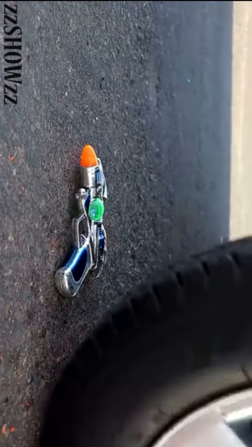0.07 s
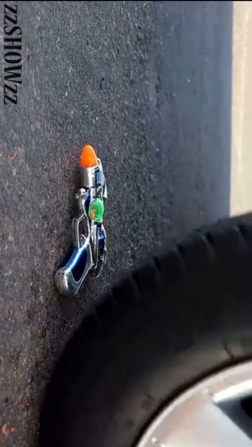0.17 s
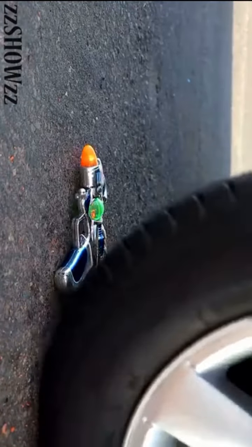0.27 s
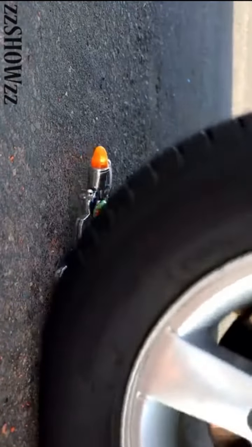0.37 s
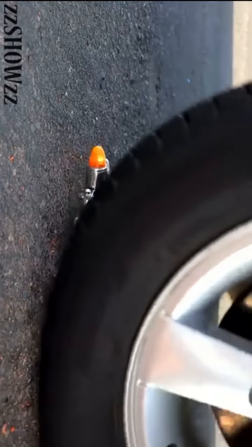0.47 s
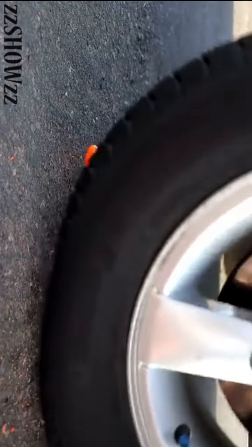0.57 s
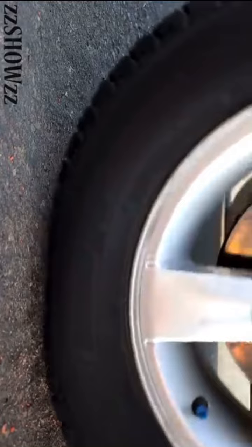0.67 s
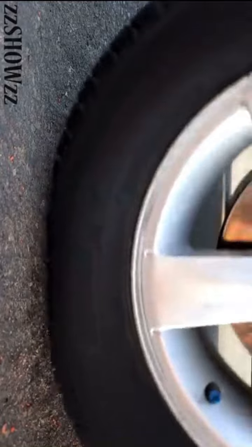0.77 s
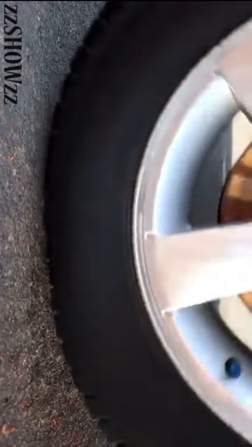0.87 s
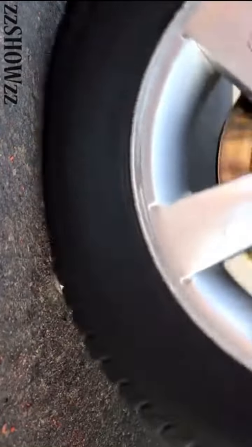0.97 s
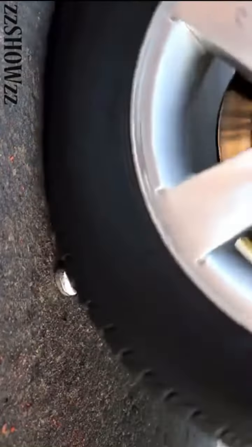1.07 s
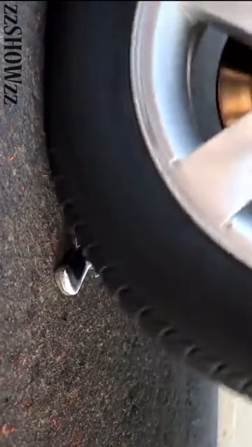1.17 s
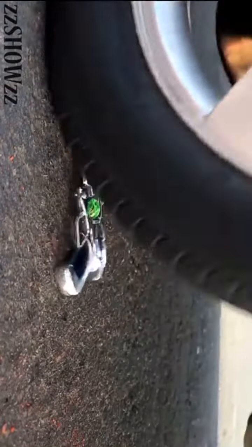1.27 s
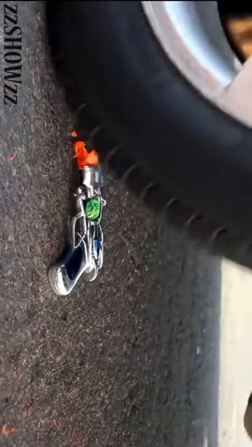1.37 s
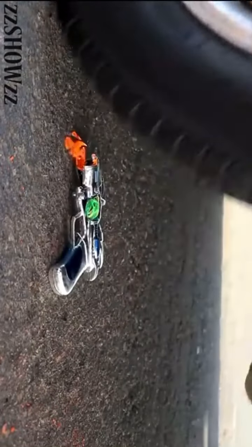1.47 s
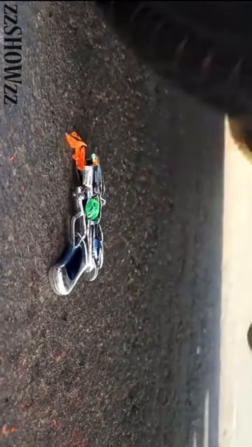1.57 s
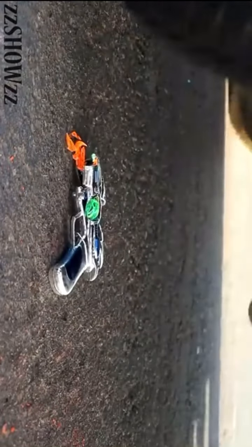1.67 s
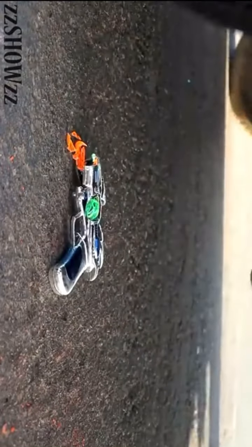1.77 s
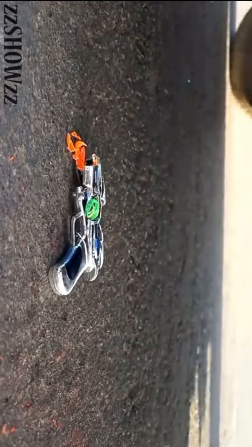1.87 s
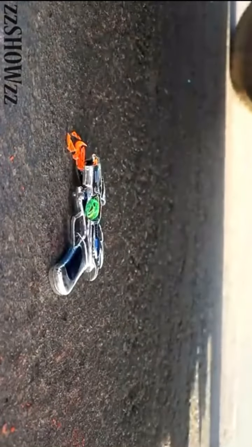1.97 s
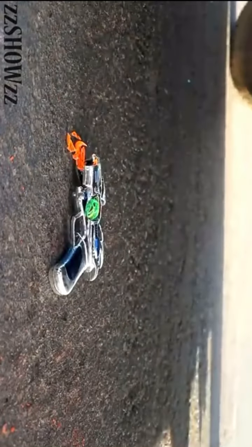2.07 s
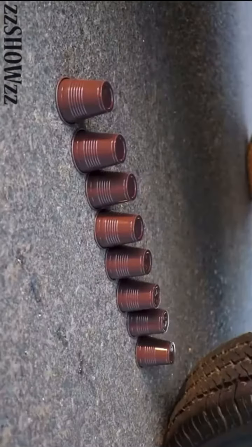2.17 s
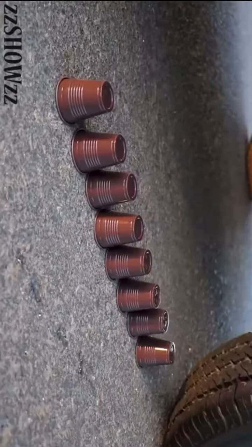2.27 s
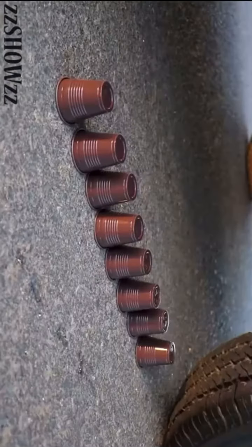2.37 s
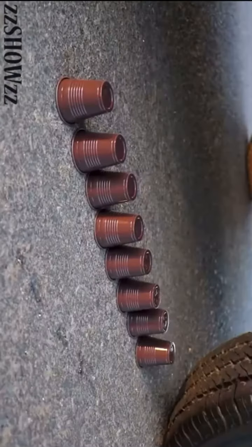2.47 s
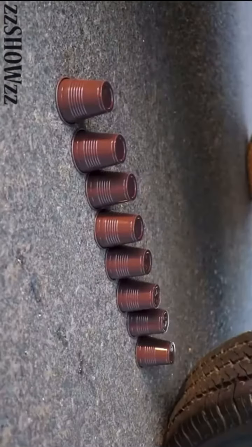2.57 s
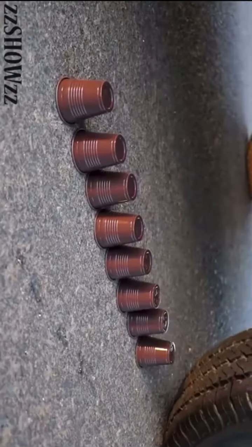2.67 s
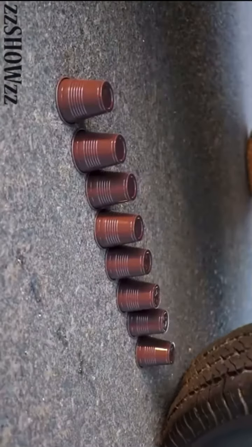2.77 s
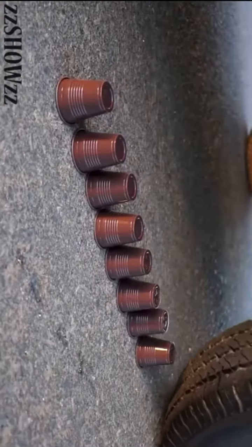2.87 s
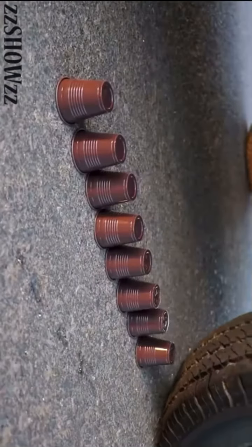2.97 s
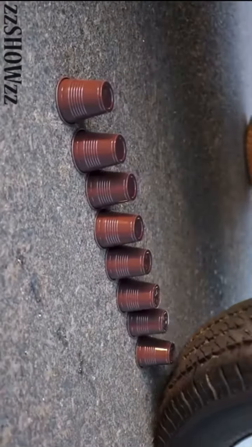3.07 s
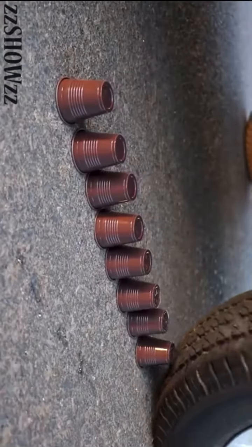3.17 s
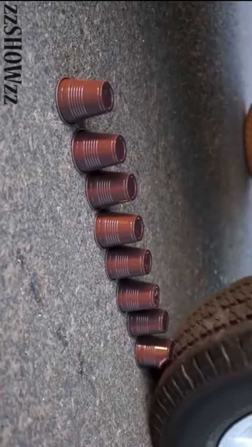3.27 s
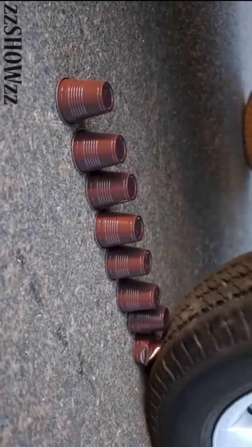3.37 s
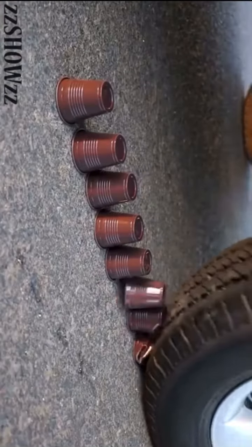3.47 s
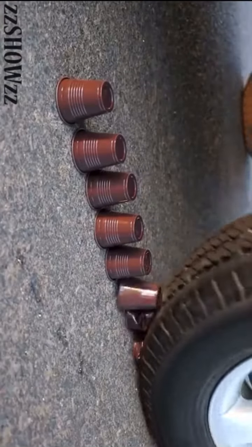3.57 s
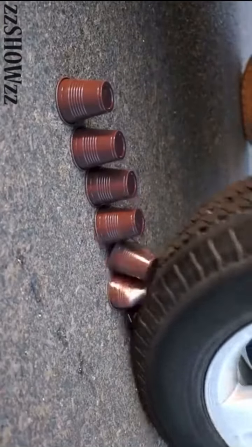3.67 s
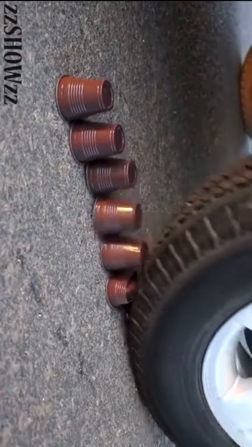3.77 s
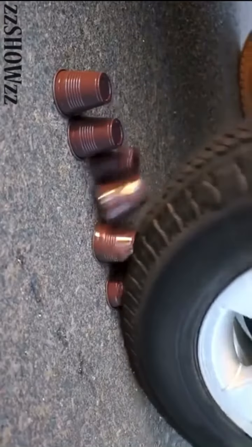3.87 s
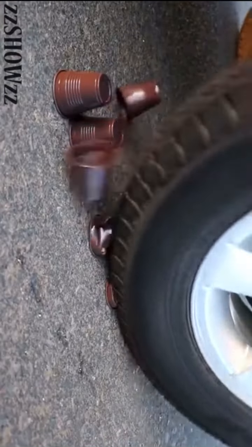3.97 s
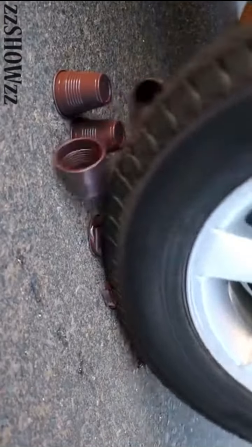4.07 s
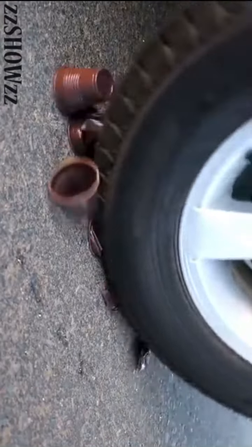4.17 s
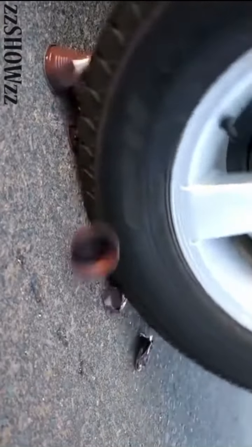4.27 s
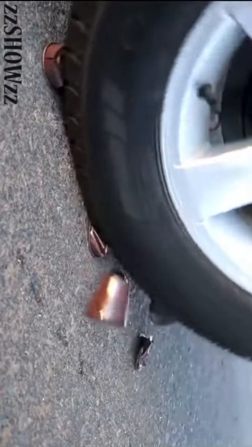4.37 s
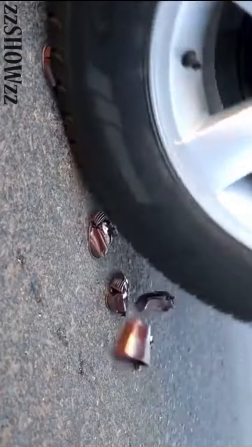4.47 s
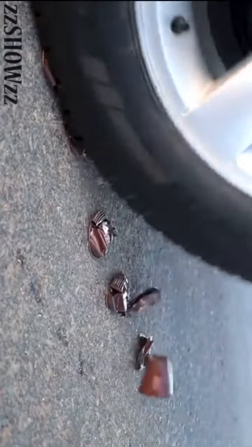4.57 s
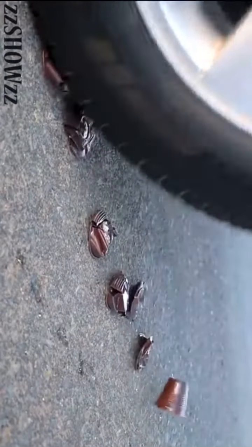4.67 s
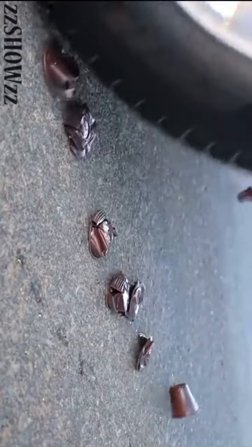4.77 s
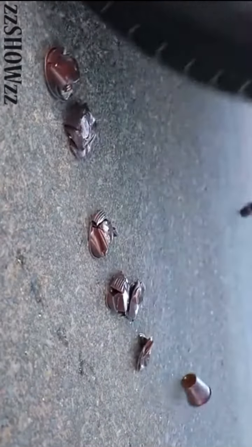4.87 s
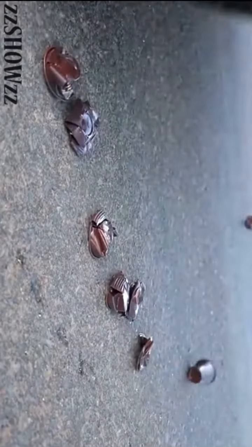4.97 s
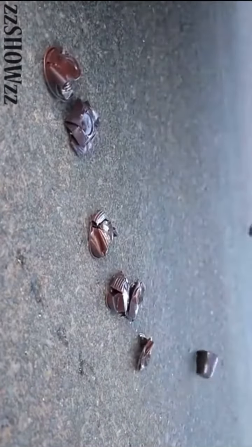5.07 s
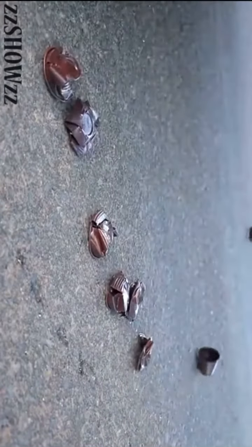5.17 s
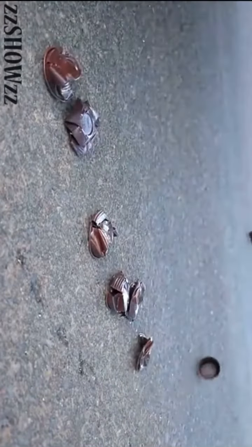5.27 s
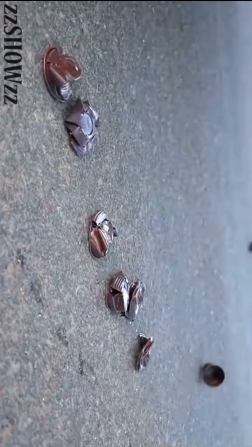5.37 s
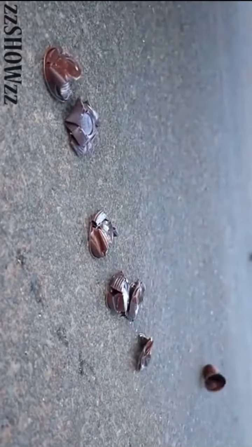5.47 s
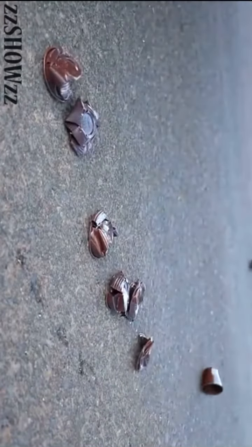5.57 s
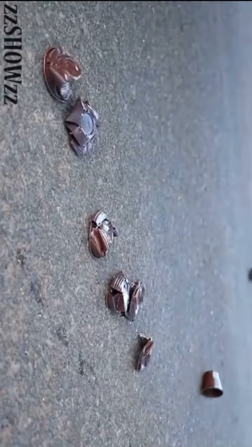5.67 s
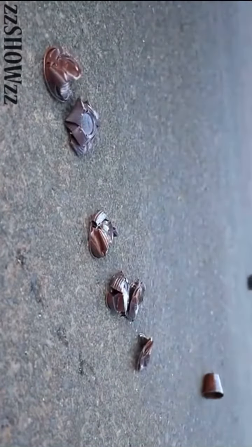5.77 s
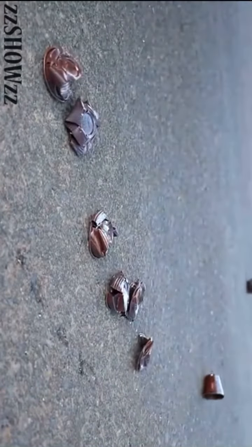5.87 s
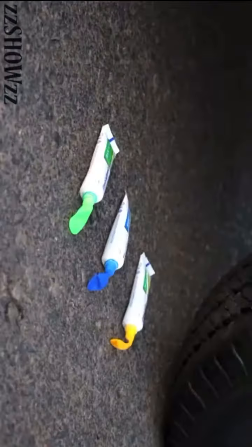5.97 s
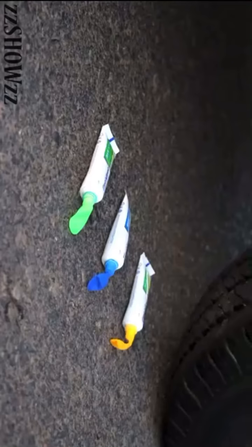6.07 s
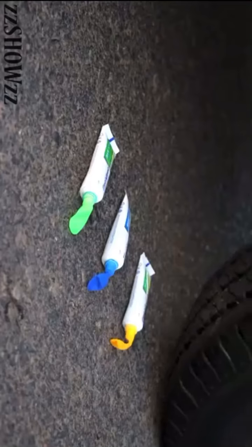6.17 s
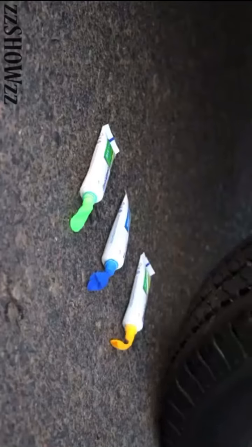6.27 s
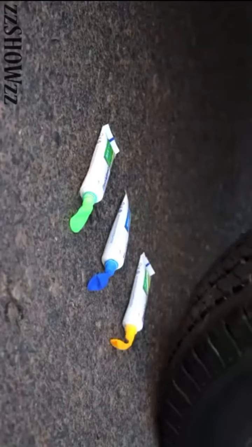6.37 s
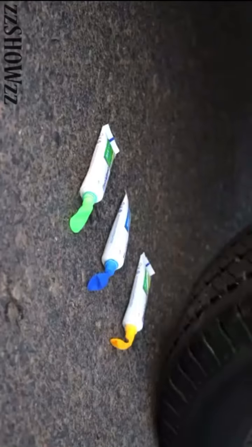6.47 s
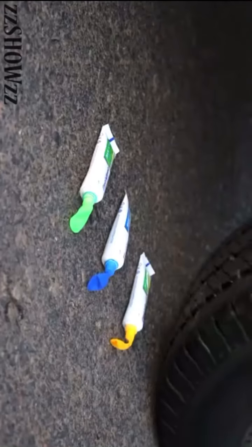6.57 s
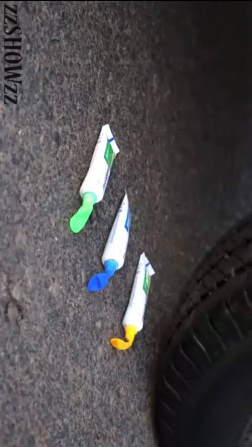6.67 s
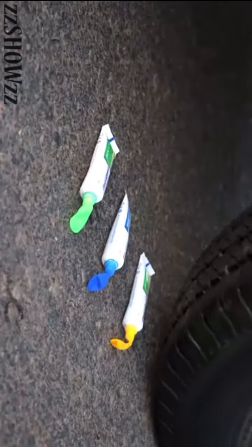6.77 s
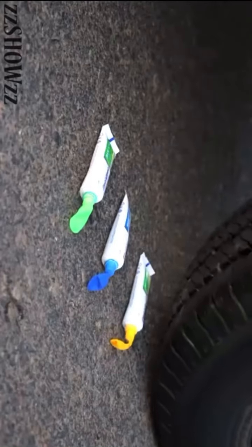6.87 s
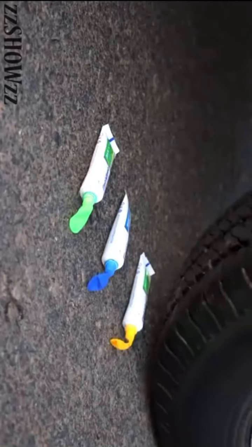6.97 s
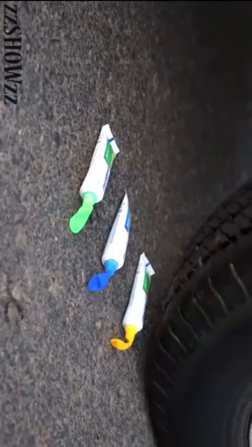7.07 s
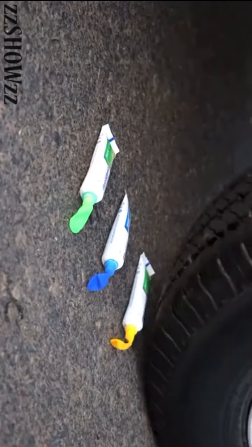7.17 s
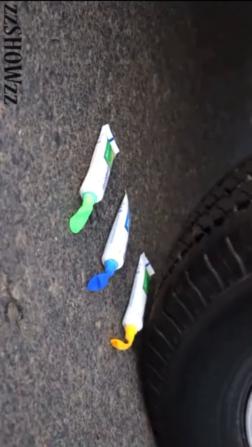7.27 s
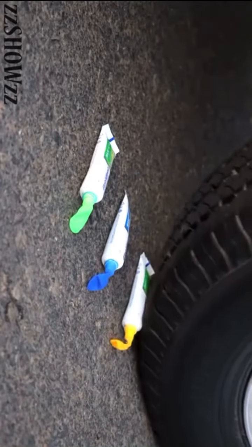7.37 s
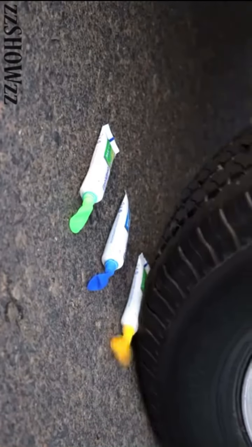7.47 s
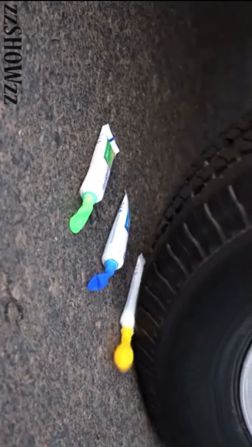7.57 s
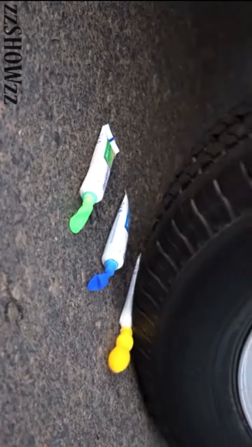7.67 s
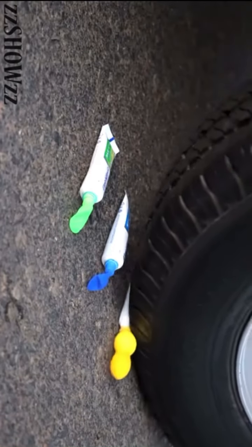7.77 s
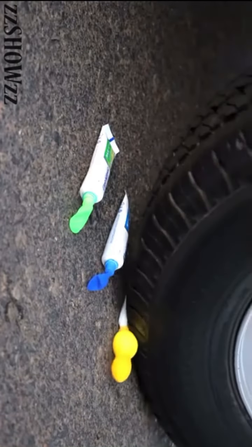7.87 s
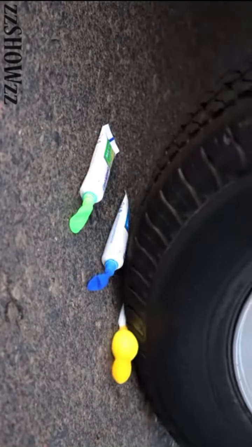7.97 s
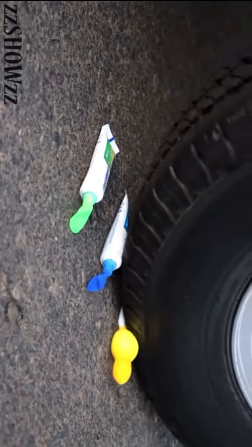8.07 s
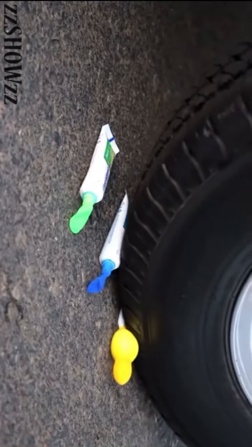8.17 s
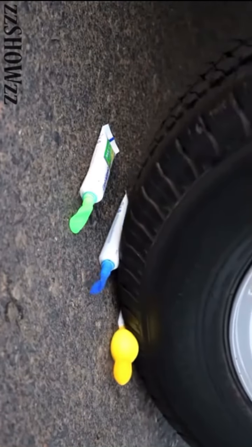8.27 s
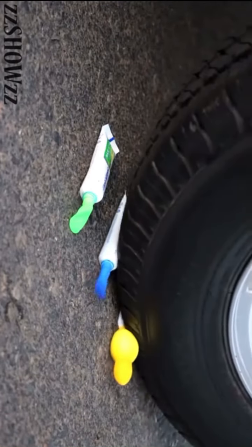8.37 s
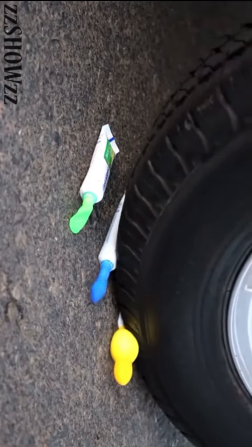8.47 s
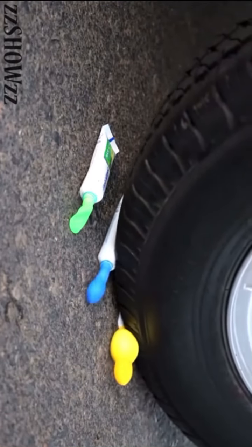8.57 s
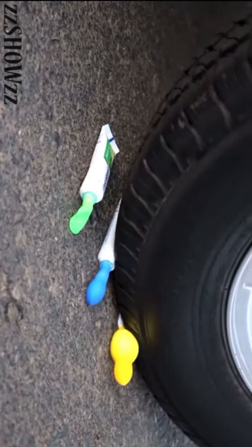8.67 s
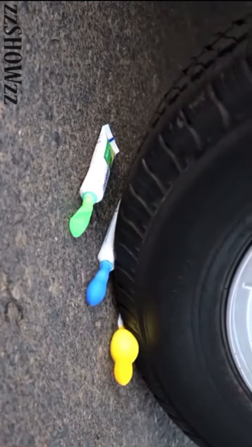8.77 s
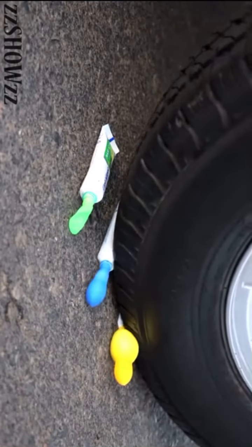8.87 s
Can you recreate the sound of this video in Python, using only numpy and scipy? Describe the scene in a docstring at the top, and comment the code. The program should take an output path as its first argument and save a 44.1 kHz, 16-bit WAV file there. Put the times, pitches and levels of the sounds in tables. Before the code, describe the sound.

A car creeps over asphalt close by, its engine and exhaust rumbling low throughout. From about 0.5 seconds the tyre breaks a hard plastic toy in sharp, hollow cracks with dull thumps, loudest between 0.7 and 1 second, thinning to small snaps by 1.5. A throbbing steering pump whines alongside, and the brake gives a brief, high squeal at about 2.1 seconds. At 2.3 the sound cuts to a quieter idle. From 3.3 to 4.5 seconds thin plastic cups buckle under the tread in a loud, dense, crackling crunch. One cup springs free and bounces with hollow taps that shrink to a light rattle, fading by 6 seconds. From there to the end, near 9 seconds, only the quiet engine remains, with a low hum that rises a little under load and a faint high whine.

```python
"""Plastic cracks and crumples under a creeping car tyre on asphalt, close up, in three shots cut together.
First a hard toy pistol breaks, each snap ringing its hollow shell, while the steering pump whines; the
brake squeals briefly. Next a row of thin cups buckles into a crunch, and one springs free and bounces
away. Last, the engine hums as the wheel climbs soft, silent tubes. Exhaust rumbles under it all."""
import sys
import numpy as np
from scipy import signal
from scipy.fft import rfft, irfft, next_fast_len
from scipy.io import wavfile
from scipy.ndimage import uniform_filter1d

SR = 44100
rng = np.random.default_rng(int(sys.argv[2]) if len(sys.argv) > 2 else 0)


def master_out(mix):
    """Clip the mix to full scale and print it as 16-bit PCM to the path in sys.argv[1]."""
    frames = np.transpose(np.atleast_2d(mix))
    ceiling = np.clip(frames, -1, 1)
    pcm = np.round(ceiling * 32767).astype(np.int16)
    wavfile.write(sys.argv[1], SR, pcm)


N = 392931
TIME = np.arange(N) / SR
FIRST_CUT_S, SECOND_CUT_S = 2.29, 6.05
SCUFF_S, SCUFF_WIDTH_S = 2.088, .015  # the tyre scuffs as the brake bites
RATTLE_START_S, RATTLE_END_S = 4.62, 5.96

# Noise colours. Each row: frequency in Hz, relative spectral density in dB.
RUMBLE_COLOUR = [(8.8, -30.5), (15, 0), (48, -2.5), (70, -3), (96, -2), (140, -3.5), (180, -33.5),
                 (310, -120)]
ENGINE_BODY_COLOUR = [(71, -47), (120, -14), (208, -19.5), (243, -9), (280, -19), (366, -8.5), (415, -18),
                      (591, -4.5), (653, -11), (1300, -12), (1630, -9.5), (3500, -18.5), (4550, -44.5),
                      (7700, -120)]
ENGINE_HISS_COLOUR = [(1650, -13), (2800, -0.5), (4240, -6.5), (5520, -6), (7830, -21), (9330, -20),
                      (11500, -32.5), (13500, -25), (16000, -36)]
RUB_COLOUR = [(1300, -29), (1620, -3.5), (1800, -1.5), (1950, -7), (2400, -15), (11500, -49),
              (12500, -26.5), (14000, -33), (16000, -41.5)]
BRAKE_HISS_COLOUR = [(3000, -30), (5000, 8.5), (8000, -20), (11700, -24), (12500, -4), (13800, -10.5),
                     (16000, -22)]
IDLE_FAN_COLOUR = [(59, -33.5), (100, -4.5), (308, -9), (621, -6), (705, -11.5), (752, -3.5), (801, -16),
                   (1100, -9), (1200, -14.5), (1650, -11.5), (2000, -18), (2270, -10), (2750, -19.5),
                   (5190, -25), (16000, -58.5)]
CREEP_FAN_COLOUR = [(59, -33), (100, -15), (153, -10.5), (189, -8), (328, -5.5), (481, -11), (608, -5.5),
                    (818, -16), (970, -13), (1520, -11.5), (1760, -16.5), (2270, -14.5), (2990, -19.5),
                    (5300, -27.5), (16000, -55)]
WHINE_COLOUR = [(4900, -8), (5290, -7), (5600, -30)]
GRIT_COLOUR = [(700, -7), (1800, 5.5), (3000, 1.5), (5200, 3), (7800, -9.5), (10000, -14.5), (16000, -24)]
SKID_COLOUR = [(1500, -14), (2200, -3), (4700, 0), (6000, -11), (7500, -3), (9000, -10), (16000, -28)]
FRACTURE_COLOUR = [(100, -0.5), (300, -5), (800, 1.5), (2000, 6.5), (5000, -1), (7500, -6.5),
                   (11000, -10.5), (16000, -13)]

# Fader rides. Each row: time in seconds, relative level in dB.
RUMBLE_RIDE = [(0, -54), (1.5, -57), (2.7, -48.5), (4.7, -52.5), (6.2, -55.5), (7.7, -55.5), (8.91, -55)]
BRAKE_RIDE = [(2.08, -82), (2.1, -59), (2.14, -38.5), (2.28, -46), (2.3, -83)]
IDLE_FAN_RIDE = [(2.3, -47), (3.3, -47.5), (4.6, -52.5), (5.1, -51), (6.04, -54)]
WHINE_RIDE = [(6.05, -68), (7.7, -71), (7.95, -65), (8.91, -68)]
GRIT_RIDE = [(.4, -59), (.95, -41), (1.5, -41), (2.3, -85), (3.3, -95.5), (3.8, -23), (4.55, -28.5),
             (4.72, -36), (5.1, -49), (6.05, -91.5)]

# The car's held tones. Each row: pitch in Hz, relative level in dB.
IDLE_TONES = [(75.4, -50), (608.3, -59)]
BELT_TONES = [(333.8, -63), (602.9, -53.5), (995.9, -57), (1163, -58), (1540, -57), (2229, -56.5)]
ENGINE_ORDERS = [(75.4, -57), (113, -58)]  # the firing rate and the order above it
BRAKE_TONES = [(3289, 3), (4894, -13), (12450, -23)]

# Engine and tyre by the toy. Each row: time in seconds, then relative body, hiss and rub levels in dB.
ENGINE_AND_TYRE_RIDE = [(0, -39.5, -48, -35.5), (.33, -38, -51, -40), (.55, -31.5, -41.5, -44),
                        (1.38, -34.5, -36.5, -60), (1.56, -34, -47, -52), (1.82, -31.5, -36.5, -50),
                        (2.28, -35.5, -40, -45)]
# The steering pump's whine under load. Each row: time in seconds, level in dB, throb depth in dB.
PUMP_RIDE = [(0, -67, 10), (.48, -37.5, 3), (1.15, -33.5, 4), (1.45, -36, 8.5), (1.8, -40, 0.5),
             (2.28, -44.5, -0.5)]
# The pump's steady low tones. Each row: multiple of the shaft rate, level in dB.
PUMP_ORDERS = [(2, -52), (3, -52.5)]
# The hum rises as the wheel climbs. Each row: time in seconds, pitch in Hz, level in dB.
LOAD_HUM = [(6.7, 142, -59), (7.25, 147, -52.5), (7.54, 171, -55.5), (7.73, 169, -54), (7.9, 146, -52),
            (8.61, 158, -53), (8.91, 154, -50)]
# Soft low puffs of air. Each row: centre in seconds, level in dB, width in seconds.
AIR_PUFFS = [(1.94, -42, .03), (6.37, -51.5, .05), (6.72, -50.5, .03)]

# How the plastic rings. Each row: pitch in Hz, relative level in dB, time to fall 60 dB in seconds.
FREE_CUP_MODES = [(1036, -11, 0.0091), (1220, -0.5, 0.035), (1259, 1, 0.095), (1720, -18, 0.24),
                  (1800, -11, 0.035), (1987, -11, 0.058), (3370, -9.5, 0.033), (3590, -15, 0.088),
                  (3816, -12, 0.05), (4620, -1, 0.02), (4833, -5.5, 0.042), (5020, -3.5, .04),
                  (5220, -3.5, 0.03), (6180, -8.5, 0.028), (6900, -20, 0.021), (7440, -22.5, 0.061),
                  (9000, -18, 0.041)]
PINNED_CUP_MODES = [(478, -18.5, 0.0235), (703, -4, 0.065), (861.6, 0, 0.058), (1050, 3.5, 0.062),
                    (1256, -1.5, 0.072), (1620, -0.5, .028), (2119, 4.5, 0.035), (2570, 0.5, 0.029),
                    (3500, -4, 0.015), (4600, -15, 0.0065), (5220, 4, 0.021), (6180, -14, 0.042),
                    (9560, -12, 0.052)]
TOY_MODES = [(292.8, -3.5, 0.029), (487, -5, 0.025), (638.3, -3.5, 0.096), (705, -3.5, 0.048),
             (874, -1.5, 0.039), (1300, 0.5, 0.014), (1840, 2, 0.041), (2300, 7, .02), (3007, -4.5, 0.018),
             (3620, 1, 0.049), (4270, -4.5, 0.0053), (4920, 2.5, 0.028), (6500, 0.5, 0.018),
             (8400, -16.5, 0.012)]

# Loose cups knock and bounce. Each row: start in seconds, relative level in dB, bass over treble in dB.
CUP_BOUNCES = [(4.13, -5, 12), (4.594, -3, 12), (4.6, -21, 12), (4.627, -18, -3), (4.753, -14, 11),
               (4.822, -13.5, -4), (4.857, -17.5, 8.5), (4.904, -26, -2), (4.921, -17, -3),
               (4.954, -15, -2.5), (5.01, -16, 5), (5.073, -22.5, -8), (5.08, -14, 8), (5.126, -29.5, -6),
               (5.187, -32, -16.5), (5.208, -30.5, 23), (5.23, -28, -6), (5.275, -27, 2), (5.3, -27.5, 15),
               (5.315, -21, 9.5), (5.374, -23.5, 5), (5.395, -21, 19.5), (5.444, -25, 9),
               (5.494, -29, 30.5), (5.517, -29, 9), (5.551, -34, 18), (5.573, -28.5, 5), (5.631, -29, 12),
               (5.676, -33, 11), (5.702, -32, 11), (5.745, -33.5, 2), (5.772, -37, 1), (5.896, -37, -5),
               (5.983, -36.5, -4)]
# A cup's rim skids. Each row: start in seconds, level in dB, length in seconds.
RIM_SKIDS = [(5.236, -37, 0.019), (5.647, -35.5, 0.032)]
# Plastic gives way in short runs of snaps.
# Each row: start in seconds, relative level in dB, length in seconds, bass over treble in dB.
CUP_BUCKLES = [(3.327, -35.5, 0.0035, 31), (3.336, -22, 0.0059, 11), (3.354, -14.5, .014, 10),
               (3.366, -9.5, 0.039, 3), (3.429, -9.5, 0.033, -2), (3.475, -20, 0.041, -0.5),
               (3.541, -13, .018, 5), (3.575, -6.5, 0.048, 4), (3.655, -12.5, 0.029, 3),
               (3.705, -17.5, .03, 7.5), (3.749, -5, 0.038, -2.5), (3.796, -16, .025, 4.5),
               (3.832, -12, 0.015, 2.5), (3.86, -2, 0.035, 7), (3.902, -2, 0.045, 4),
               (3.958, -4, .045, -1.5), (4.013, -12, 0.05, -10), (4.101, -14.5, 0.015, -7),
               (4.144, -19, .028, -9), (4.193, -7.5, 0.031, 3), (4.242, -7, 0.044, -3),
               (4.303, -19, 0.02, 14.5), (4.324, -1, 0.046, 3), (4.397, -10.5, 0.029, -1.5),
               (4.444, -17.5, 0.026, -11.5), (4.48, -18, 0.032, -11), (4.551, -22, .003, -3.5),
               (4.569, -25, .005, -7), (4.635, -34.5, 0.0066, -30.5), (4.681, -39.5, 0.011, -27),
               (4.806, -30, .004, -24), (4.991, -34.5, 0.0056, -19)]
TOY_CRACKS = [(.472, -17, .002, -8), (.477, -13, .006, -7), (.543, -19, .002, -6.5), (.57, -12, 0.0054, -4),
              (.594, -24.5, 0.005, 1), (.686, -16.5, 0.0063, -2), (.718, -2.5, 0.023, -1.5),
              (.76, -3, 0.017, -3.5), (.808, -5, .007, -0.5), (.842, -11.5, .014, -6), (.861, 1, 0.02, -4),
              (.888, -3, .022, 1.5), (.937, -20, 0.021, -9), (.963, -1, .008, 5), (.982, -16.5, 0.024, -1),
              (1.015, -8, .008, 4), (1.075, -17.5, 0.0026, -6.5), (1.181, -28, 0.0062, -5),
              (1.208, -35, 0.0032, -7), (1.251, -28.5, .002, -12), (1.271, -21.5, .02, -17.5),
              (1.369, -27.5, .003, -6), (1.387, -31, 0.0029, -18.5), (1.442, -24, .002, -10.5)]
# The toy's shell springs back. Each row: start in seconds, relative level in dB.
TOY_KNOCKS = [(1.016, 2.5), (1.077, -10.5)]
# The tyre drops through the toy.
# Each row: start in seconds, level in dB, pitch in Hz, time to fall 60 dB in seconds.
TYRE_THUMPS = [(.719, -15, 42, 0.1), (0.723, -10, 95.8, 0.043), (0.963, -6, 177, 0.033)]


def from_db(db):
    """Decibels to gain."""
    return 10 ** (np.asarray(db) / 20)


def unit_rms(x):
    """Scale to unit power."""
    return x / np.sqrt(np.mean(x ** 2) + 1e-20)


def ride(rows):
    """One automation curve for each column after the time."""
    times, *columns = np.transpose(rows)
    return [np.interp(TIME, times, column) for column in columns]


def decay(t, t60):
    """A tail that loses 60 dB in t60 seconds."""
    return np.exp(-np.log(1000) * t / t60)


def swell(centre_s, width_s):
    """A bell-shaped rise and fall."""
    return np.exp(-.5 * ((TIME - centre_s) / width_s) ** 2)


def shot(start_s, end_s):
    """A gate that opens between two cuts, with 10 ms fades."""
    return np.clip((TIME - start_s) / .01 + .5, 0, 1) * np.clip((end_s - TIME) / .01 + .5, 0, 1)


def noise(colour, size=N):
    """Coloured noise at unit power."""
    hz, db = np.transpose(colour)
    n = next_fast_len(size)
    log_hz = np.log(np.arange(n // 2 + 1) * SR / n + 1e-3)
    gain = from_db(np.interp(log_hz, np.log(np.sort(hz)), db, left=-120, right=-120))
    return unit_rms(irfft(rfft(rng.standard_normal(n)) * gain, n)[:size])


def drift(turns_per_s):
    """A slow random wander with a spread of about 1."""
    return np.interp(TIME * turns_per_s, np.arange(2000), rng.standard_normal(2000))


def tone(hz, waver, flutter_db):
    """A sine near unit power that wavers in pitch and flutters in level."""
    phase = 2 * np.pi * np.cumsum(hz * (1 + waver * drift(20))) / SR
    return np.sqrt(2) * np.sin(phase) * from_db(flutter_db * drift(10))


def ring(hz, db, t60):
    """A quarter second of one struck mode."""
    t = np.arange(SR // 4) / SR
    return from_db(db) * np.sin(2 * np.pi * hz * t) * decay(t, t60)


def add(out, start_s, sound):
    """Drop a sound onto the track."""
    at = max(round(start_s * SR), 0)
    out[at:at + len(sound)] += sound[:N - at]


def strain(breaks, t60):
    """An envelope that holds through each break, then dies away."""
    power = np.zeros(N)
    t = np.arange(SR // 2) / SR
    for start_s, db, length_s, _ in breaks:
        add(power, start_s, (from_db(db) * decay(np.maximum(t - length_s, 0), t60)) ** 2)
    return np.sqrt(power)


def rumble():
    """The low bed: exhaust and air, with a shudder of the tyre whenever plastic gives way."""
    shudder = from_db(-37) * strain(TOY_CRACKS, t60=.12) + from_db(-42) * strain(CUP_BUCKLES, t60=.15)
    puffs = sum(from_db(db) * swell(centre_s, width_s) for centre_s, db, width_s in AIR_PUFFS)
    return (from_db(ride(RUMBLE_RIDE)[0]) + shudder + puffs) * noise(RUMBLE_COLOUR)


def idling_engine():
    """A quiet idle: two faint tones in a wash of fan noise."""
    fan = from_db(ride(IDLE_FAN_RIDE)[0]) * noise(IDLE_FAN_COLOUR)
    return fan + sum(from_db(db - 9) * tone(hz, waver=.0044, flutter_db=1.5) for hz, db in IDLE_TONES)


def creeping_engine(whine_hz=5260):
    """Engine and belt tones in fan noise, with a hum that rises under load and a faint high whine."""
    hum_hz, hum_db = ride(LOAD_HUM)
    hum = from_db(hum_db) * tone(hum_hz, waver=.0051, flutter_db=3)
    belt = sum(from_db(db - 6.5) * tone(hz, waver=.00702, flutter_db=3) for hz, db in BELT_TONES)
    firing = sum(from_db(db) * tone(hz, waver=.0044, flutter_db=2) for hz, db in ENGINE_ORDERS)
    whine = from_db(1.5) * noise(WHINE_COLOUR) + from_db(-4.5) * tone(whine_hz, waver=.003, flutter_db=3)
    fan = from_db(-46.5) * noise(CREEP_FAN_COLOUR)
    return fan + hum + belt + firing + from_db(ride(WHINE_RIDE)[0]) * whine


def engine_and_tyre():
    """Close engine and tyre noise: body, hiss and a rubbing band; the body swells as the tyre scuffs."""
    body_db, hiss_db, rub_db = ride(ENGINE_AND_TYRE_RIDE)
    scuff = from_db(-32.5) * swell(SCUFF_S, SCUFF_WIDTH_S)
    body = (from_db(body_db - 2) + scuff) * noise(ENGINE_BODY_COLOUR)
    hiss = from_db(hiss_db - 3) * noise(ENGINE_HISS_COLOUR)
    return body + hiss + from_db(rub_db) * noise(RUB_COLOUR)


def steering_pump(start_hz=606.4, sag_hz_per_s=4, throb_hz=6.1, throb_peak_s=1.29):
    """The loaded pump throbs and whines at five times its shaft rate, slowly sagging in pitch."""
    level_db, depth_db = ride(PUMP_RIDE)
    throb_db = depth_db * np.cos(2 * np.pi * throb_hz * (TIME - throb_peak_s))
    whine_hz = start_hz - sag_hz_per_s * TIME
    shaft_hz = whine_hz / 5
    whine = from_db(level_db + throb_db) * tone(whine_hz, waver=.006, flutter_db=1)
    return whine + sum(from_db(db) * tone(order * shaft_hz, waver=.0058, flutter_db=0)
                       for order, db in PUMP_ORDERS)


def brake():
    """The brake rubs: a short, bright squeal over hiss."""
    squeal = sum(from_db(db) * tone(hz, waver=.0012, flutter_db=3) for hz, db in BRAKE_TONES)
    return from_db(ride(BRAKE_RIDE)[0]) * (squeal + from_db(-4.5) * noise(BRAKE_HISS_COLOUR))


def grit(clicks_per_s=900):
    """Grit and creased plastic crackle unevenly under the tread, in each cup fold and in the scuff."""
    clicks = (rng.random(N) < clicks_per_s / SR) * from_db(3.1 * np.minimum(rng.exponential(1, N), 3.5))
    clicks *= rng.choice([-1, 1], N)
    grain_power = signal.fftconvolve(clicks ** 2, decay(np.arange(SR // 50) / SR, t60=.0028))[:N]
    crackle = unit_rms(np.sqrt(np.abs(grain_power)) * noise(GRIT_COLOUR))
    creasing = from_db(-12) * strain(CUP_BUCKLES, t60=.057)
    scuff = from_db(-30) * swell(SCUFF_S, SCUFF_WIDTH_S)
    return (from_db(ride(GRIT_RIDE)[0]) + creasing + scuff) * crackle


def snap_runs(breaks, fade_db, uneven_db, colour_db, jitter, count):
    """Spread each break into count uneven snaps that fade as the stress is spent."""
    start_s, db, length_s, bass_db = np.transpose(breaks)[:, :, None]
    timing, strength, colour = rng.uniform(-1, 1, (len(start_s), 3, count)).transpose(1, 0, 2)
    step = np.arange(count)
    progress = (step + jitter * timing * (step > 0)) / (count - 1)
    snap_db = db - fade_db * progress + uneven_db * strength
    columns = start_s + length_s * progress, snap_db, bass_db + colour_db * colour
    return np.stack(columns, axis=-1).reshape(-1, 3)


def voice_hits(hits, middle_db, hollow_share):
    """Give each hit its tick, low, middle and high levels; the bassier it is, the hollower its middle."""
    start_s, db, bass_db = np.transpose(hits)
    low_db, high_db = db + bass_db / 2, db - bass_db / 2
    return np.transpose([start_s, high_db, low_db, db + middle_db - hollow_share * bass_db, high_db])


def plastic_snaps(hits, modes, edges_hz, facets, detune, warp, uneven_db, tear_db, tear_t60,
                  splinter_db, splinter_t60, scatter_db, scatter_t60, tick_db, tick_t60):
    """Each snap rings the facets of a shell, splinters for a moment and scatters between car and road."""
    starts_s, hit_tick_db, *bands_db = np.transpose(hits)
    count, size = len(hits), SR // 6
    t = np.arange(size) / SR

    def hiss(db, t60):
        """A fresh burst of fracture noise for every hit."""
        return noise(FRACTURE_COLOUR, count * size).reshape(count, size) * from_db(db) * decay(t, t60)

    shell = hiss(tear_db, tear_t60)
    for hz, db, t60 in list(modes) * facets:
        # each snap bends the shell anew: modes change strength and shift, with warp the high ones most
        shift, strength, polarity = rng.standard_normal((count, 3)).T[:, :, None]
        bent_hz = hz * np.exp(detune * (hz / 1000) ** warp * shift)
        gain = np.sign(polarity) * from_db(db + uneven_db * strength) / np.sqrt(facets)
        shell += gain * decay(t, t60) * np.sin(2 * np.pi * bent_hz * t)
    # smaller slips follow the first within milliseconds
    slips = (rng.random((count, size)) < 600 / SR) * rng.standard_normal((count, size))
    slips *= from_db(splinter_db) * decay(t, splinter_t60)
    slips[:, 0] = 1
    body = signal.fftconvolve(shell, slips, axes=1)[:, :size]
    body += hiss(scatter_db, scatter_t60) * (1 - decay(t, t60=.0067))
    snaps = hiss(hit_tick_db[:, None] + tick_db, tick_t60)
    # big pieces sound low, small ones high: each snap has its own balance of three bands
    for low_hz, high_hz, db in zip(edges_hz, edges_hz[1:], bands_db):
        band = signal.sosfilt(signal.butter(3, [low_hz, high_hz], "band", fs=SR, output="sos"), body)
        peak_power = uniform_filter1d(band ** 2, size=SR // 170, axis=1).max(axis=1)
        snaps += band * (from_db(db) / np.sqrt(peak_power))[:, None]
    out = np.zeros(N)
    for start_s, snap in zip(starts_s, snaps):
        add(out, start_s, snap)
    # small shells radiate little bass
    return signal.sosfilt(signal.butter(1, edges_hz[0], "high", fs=SR, output="sos"), out + 1e-18)


def rattle_touches(count=40, crowding=.65, fade_db_per_s=4.5, bass_db=-2):
    """Light, uneven touches between the bounces, quicker and weaker as the cup settles."""
    timing, strength = rng.uniform(0, 1, (count, 2)).T
    elapsed_s = ((np.arange(count) + timing) / count) ** crowding * (RATTLE_END_S - RATTLE_START_S)
    db = -37.5 - fade_db_per_s * elapsed_s + 6 * (strength - .5)
    return np.transpose([RATTLE_START_S + elapsed_s, db, np.full(count, bass_db)])


def bouncing_cups(wall_fade_db_per_s=13):
    """Hollow pocks shrink to a rattle: the cup's bottom holds its pitch, its wall varies, its rim skids."""
    touches = np.vstack([CUP_BOUNCES, rattle_touches()])
    rolling_s = np.maximum(touches[:, 0] - RATTLE_START_S, 0)
    knocks = voice_hits(touches, middle_db=-1.5 - wall_fade_db_per_s * rolling_s, hollow_share=.19)
    out = from_db(-3) * plastic_snaps(
        knocks, FREE_CUP_MODES, edges_hz=[900, 1500, 3000, 17000], facets=1, detune=.0029, warp=1.14,
        uneven_db=4.5, tear_db=-9, tear_t60=.019, splinter_db=-17.5, splinter_t60=.071,
        scatter_db=-18.5, scatter_t60=.21, tick_db=-7, tick_t60=.006)
    for start_s, db, length_s in RIM_SKIDS:
        size = int(length_s * SR)
        add(out, start_s, from_db(db) * np.sqrt(np.hanning(size)) * noise(SKID_COLOUR, size))
    return out


def crumpling_cups():
    """Thin walls pinned under the tread fold in runs of buckles that merge into a crunch."""
    runs = snap_runs(CUP_BUCKLES, fade_db=2, uneven_db=4.5, colour_db=11.5, jitter=.35, count=4)
    buckles = voice_hits(runs, middle_db=4.5, hollow_share=.2)
    return from_db(-2.5) * plastic_snaps(
        buckles, PINNED_CUP_MODES, edges_hz=[220, 1400, 3500, 18000], facets=3, detune=.06, warp=.4,
        uneven_db=3, tear_db=4, tear_t60=.036, splinter_db=-1.5, splinter_t60=.046,
        scatter_db=-3, scatter_t60=.099, tick_db=4, tick_t60=.00299)


def toy_knocks(low_hz=680, high_hz=1000):
    """The shell springs back with a hollow knock as the tyre rolls off it."""
    knock = sum(ring(hz, db, t60) for hz, db, t60 in TOY_MODES if low_hz < hz < high_hz)
    out = np.zeros(N)
    for start_s, db in TOY_KNOCKS:
        add(out, start_s, from_db(db) * knock)
    return out


def cracking_toy():
    """Thick, brittle plastic breaks in sharp cracks; the tyre thumps down as it gives way."""
    runs = snap_runs(TOY_CRACKS, fade_db=6.5, uneven_db=1, colour_db=3.5, jitter=.25, count=3)
    cracks = voice_hits(runs, middle_db=.5, hollow_share=.41)
    out = from_db(-1.5) * plastic_snaps(
        cracks, TOY_MODES, edges_hz=[220, 1000, 3000, 18000], facets=3, detune=.055, warp=.4,
        uneven_db=5.5, tear_db=7.5, tear_t60=.023, splinter_db=-5, splinter_t60=.022,
        scatter_db=0, scatter_t60=.095, tick_db=4.5, tick_t60=.003)
    for start_s, db, hz, t60 in TYRE_THUMPS:
        add(out, start_s, ring(hz, db, t60))
    return out


def scene():
    """The mono mix: plastic up front, over a car bed that changes at each cut."""
    car = (engine_and_tyre() + steering_pump() + brake()) * shot(-1, FIRST_CUT_S)
    car += idling_engine() * shot(FIRST_CUT_S, SECOND_CUT_S)
    car += creeping_engine() * shot(SECOND_CUT_S, np.inf)
    car += rumble()
    plastic = cracking_toy() + toy_knocks() + crumpling_cups() + bouncing_cups()
    return (plastic + grit() + car)[None]


def record(dry, toy_ceiling=.92, cup_ceiling=.6, release_db_per_s=1200, cutoff_hz=16000):
    """A fast limiter, set lower after the first cut, holds the cracks down; the very top is cut off."""
    ceiling = np.where(TIME < FIRST_CUT_S, toy_ceiling, cup_ceiling)
    over_db = 20 * np.log10(np.maximum(np.abs(dry[0]) / ceiling, 1))
    held_db = np.maximum.accumulate(over_db + release_db_per_s * TIME) - release_db_per_s * TIME
    # duck by 60% of the held overshoot and clip the rest
    limited = np.clip(dry * from_db(-.6 * held_db), -ceiling, ceiling)
    return signal.sosfilt(signal.ellip(10, .2, 70, cutoff_hz, fs=SR, output="sos"), limited)


dry = scene()
out = record(dry)
master_out(out)
```